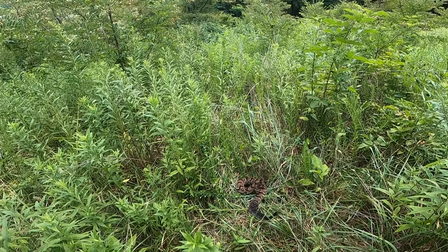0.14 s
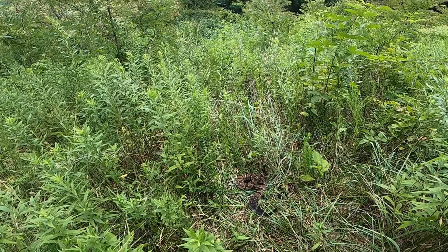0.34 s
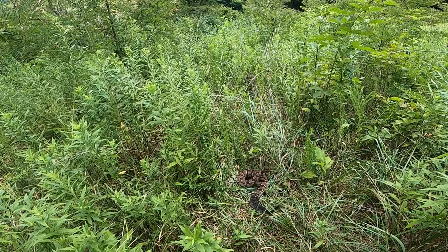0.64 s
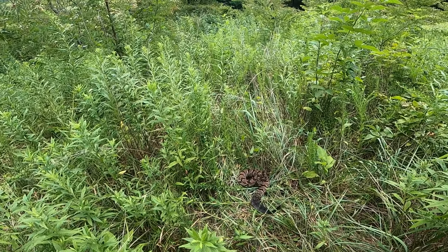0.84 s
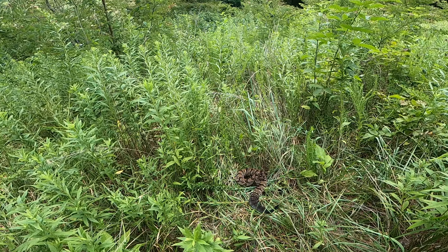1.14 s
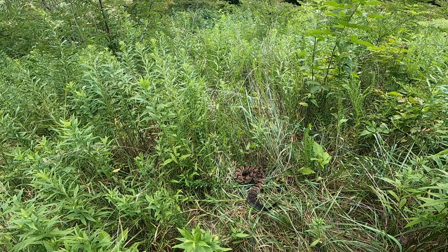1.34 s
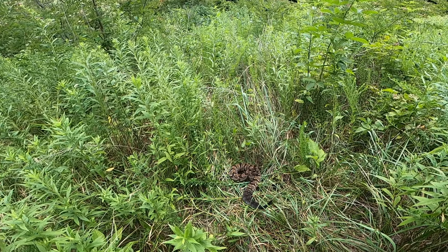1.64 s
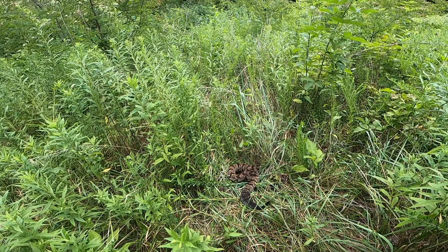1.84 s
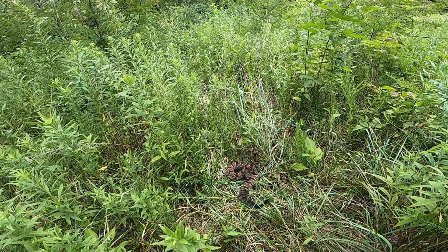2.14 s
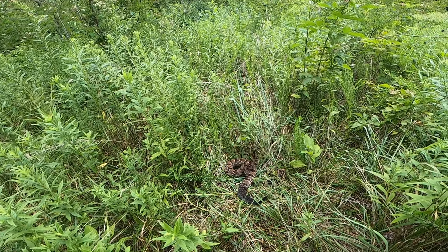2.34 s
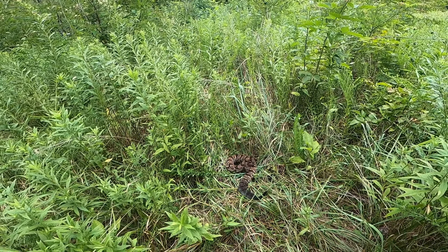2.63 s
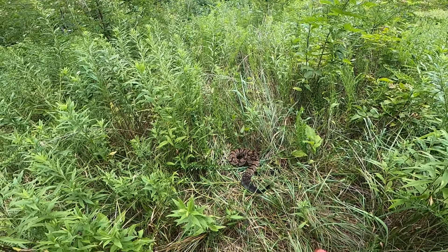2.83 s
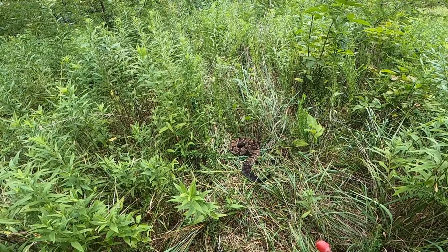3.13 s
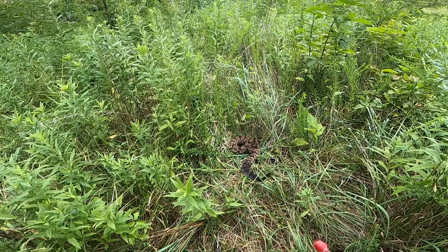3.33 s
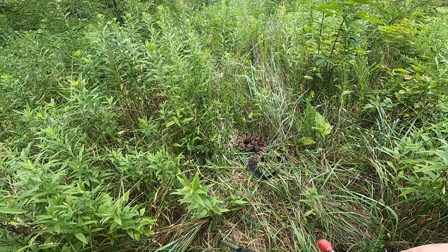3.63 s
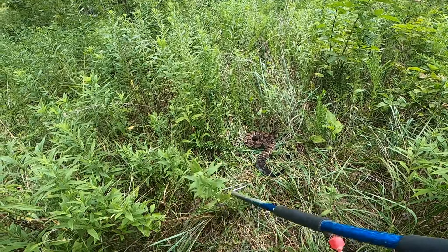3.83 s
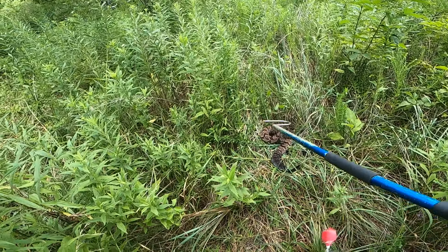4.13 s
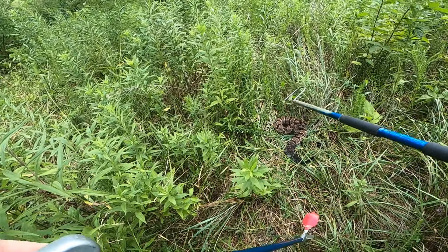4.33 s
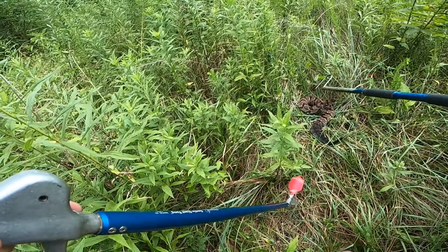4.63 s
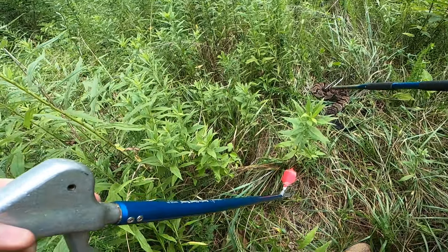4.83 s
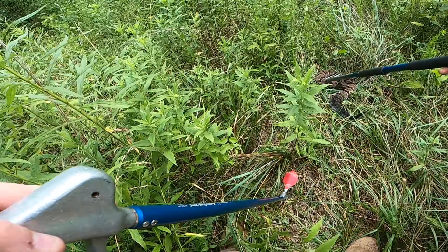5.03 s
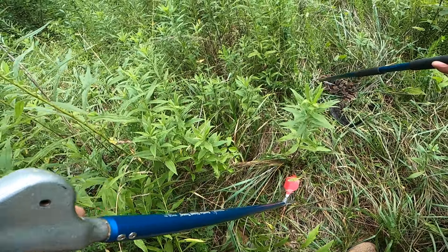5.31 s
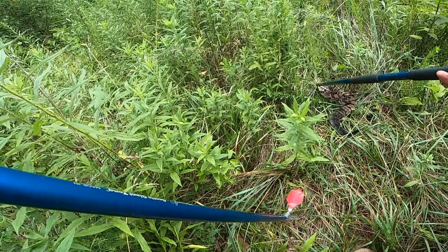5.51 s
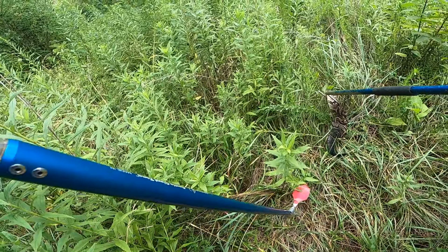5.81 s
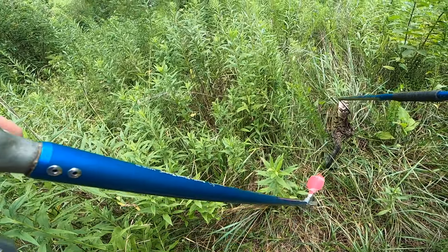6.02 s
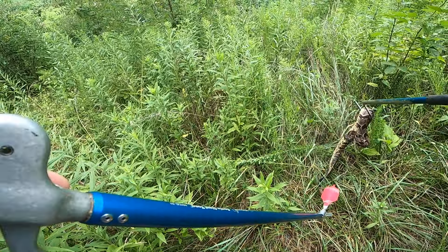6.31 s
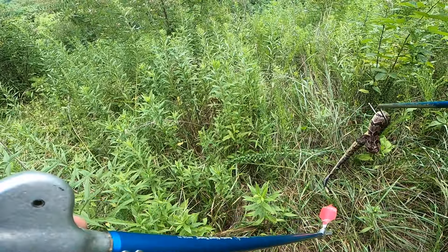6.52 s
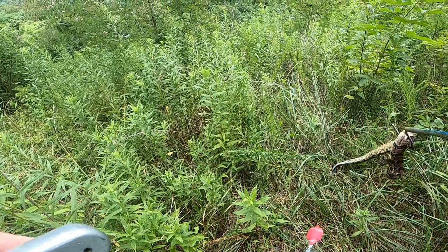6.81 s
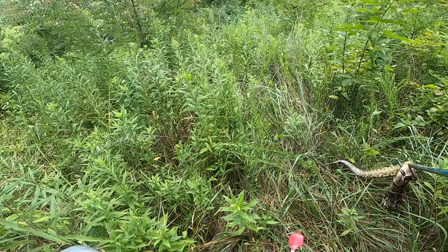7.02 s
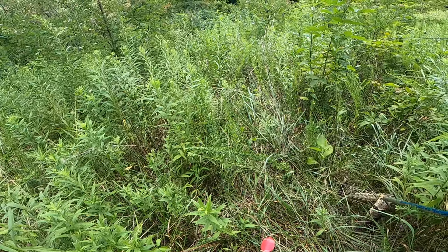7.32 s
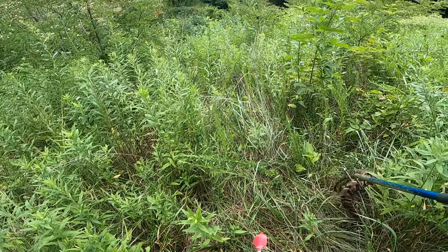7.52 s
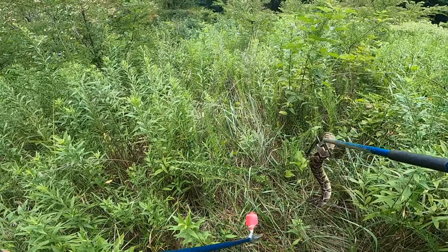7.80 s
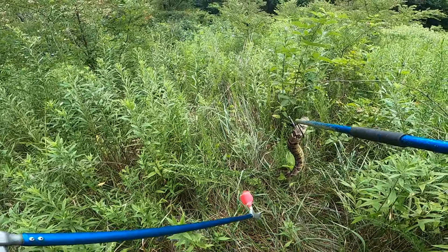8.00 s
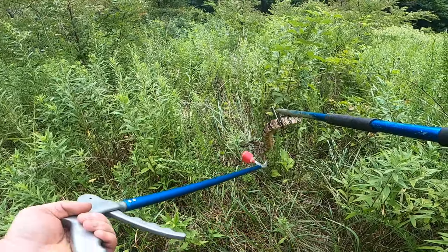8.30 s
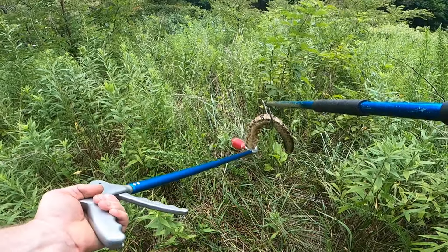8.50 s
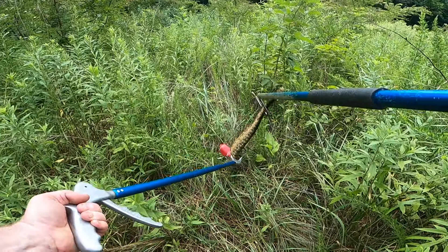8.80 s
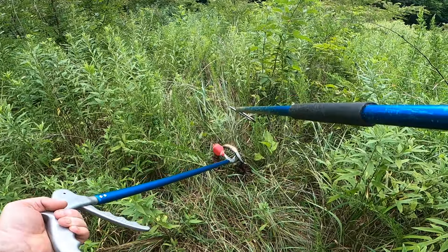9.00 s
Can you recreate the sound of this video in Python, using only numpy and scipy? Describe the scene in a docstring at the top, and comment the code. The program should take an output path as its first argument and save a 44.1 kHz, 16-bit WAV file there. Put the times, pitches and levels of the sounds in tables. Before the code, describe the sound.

A rattlesnake buzzes loud, dry and steady in tall grass, faltering as it is lifted, with small tool knocks and soft low bumps.

```python
"""Tall grass outdoors, a distant hush behind: a rattlesnake buzzes to the right of a hand-held microphone.
It is lifted on a hook, swings free and is lowered toward tongs; the buzz falters or surges at its lurches.
The tail shakes some 75 times a second, four clacks a shake, each a volley of clicks ringing hollow segments.
Tools knock as noise bursts with a damped ring, clothes and grass rustle as swelling filtered noise,
and puffs of low noise and short low tones that swell and fade reach the microphone as soft bumps."""
import sys
import numpy as np
from scipy import signal
from scipy.fft import rfft, irfft, next_fast_len
from scipy.io import wavfile
from scipy.ndimage import uniform_filter1d, map_coordinates

SR = 44100
rng = np.random.default_rng(int(sys.argv[2]) if len(sys.argv) > 2 else 0)


def materialize(psi):
    """Save the field psi as 16-bit PCM at rate SR to the path in sys.argv[1].

    A 1-D psi becomes a single channel; in a 2-D psi each row is a channel.
    """
    bounded = np.clip(np.atleast_2d(psi).T, -1, 1)
    quanta = np.round(bounded * 32767).astype(np.int16)
    wavfile.write(sys.argv[1], SR, quanta)


N = 403515  # length in samples

# Levels are relative: brushes, sweeps, puffs, knocks and the rattling effort add a gain set in scene(),
# thumps and flicks do not.
# Spectrum of the distant outdoor hush: pitch_hz, density_db (per Hz, relative)
FIELD_COLOUR = [(30, -19), (95, -29), (150, 5.5), (250, -0.5), (420, -19), (750, -16), (1500, -36),
                (5000, -29)]
# Spectrum of brushing cloth: pitch_hz, density_db (per Hz, relative)
CLOTH_COLOUR = [(80, -32), (160, -4.5), (300, 3), (480, -1), (750, -6), (1200, -8.5), (3000, -22.5)]
# Sleeves brush as the handler moves: peak_s, level_db, length_s
BRUSHES = [(.48, -65, 0.45), (.9, -58, 0.97), (1.35, -67.5, .5), (2.75, -71, .8), (3.27, -68.5, 0.76),
           (4.04, -57.5, 0.61), (4.29, -61.5, 0.4), (5.1, -63, 0.97), (5.73, -60.5, 0.73),
           (7.13, -56.5, 0.53), (7.5, -65, 1), (8.3, -63.5, 1), (8.6, -61.5, 0.52), (9.05, -55, 0.48)]
# Spectrum of dry grass: pitch_hz, density_db (per Hz, relative)
GRASS_COLOUR = [(300, -22.5), (800, -18.5), (1100, -3.5), (1500, 0), (2100, -1), (3500, 7.5), (8000, -3.5),
                (15000, -19)]
# The tools sweep through the grass: peak_s, level_db, length_s
SWEEPS = [(.82, -56, 0.86), (4.03, -52, 1), (4.28, -52.5, 0.79), (5.1, -52.5, 0.62), (5.6, -55.5, 1),
          (6.6, -55.5, 1), (7.45, -53, 1), (8.15, -60, 0.97), (8.97, -53, .7)]
# Spectrum of air on the microphone: pitch_hz, density_db (per Hz, relative)
RUMBLE_COLOUR = [(10, 1), (25, 8), (48, 4), (70, -8.5), (100, -15.5), (150, -19), (300, -46), (1000, -88)]
# Puffs of air on the microphone: peak_s, level_db, length_s
PUFFS = [(.23, -64, .2), (1.21, -48, .2), (1.5, -39.5, 0.45), (2.16, -59, .12), (2.73, -50, 0.26),
         (3.22, -52.5, 0.34), (3.69, -57.5, 0.17), (5.17, -55, 0.18), (5.6, -42.5, 0.53),
         (5.88, -36.5, 0.39), (6.85, -64, .13), (7.99, -51.5, 0.18), (8.14, -52.5, .15), (8.36, -61, 0.11),
         (8.66, -65, .14), (9.07, -62, .14)]
# Soft bumps: centre_s, level_db, pitch_hz, half_length_s
THUMPS = [(1.281, -39.5, 70, 0.0062), (1.44, -24.5, 48.4, 0.013), (1.547, -36, 96, 0.011),
          (1.693, -38.5, 55, 0.0061), (2.157, -43, 250, 0.0029), (2.691, -49, 65, 0.0078),
          (2.735, -44, 135, 0.0052), (5.8, -29, 50, 0.014), (5.866, -28, 50.7, 0.041),
          (5.871, -31, 96, 0.013), (8.013, -52, 75, 0.017), (9.067, -37, 182, 0.0044)]
# Spectrum of a tool knock: pitch_hz, density_db (per Hz, relative)
KNOCK_COLOUR = [(60, -42), (180, 4.5), (450, -1), (800, -0.5), (1400, 4.5), (2600, 3.5), (4000, 6.5),
                (9000, -13), (15000, -25)]
# Knocks of the tools and of stems against them:
# start_s, level_db, ring_hz, left_over_right_db, ring_db, snap_db (treble tilt reached at 10 kHz)
KNOCKS = [(0.42,-40.5,1790,1,-3,-2), (0.465,-41.5,1950,3,-2,-2), (0.804,-35.5,1520,5,-10,2),
          (0.995,-30,1500,5,-15,-5), (1.09,-41,1940,2,3,0), (1.263,-23,1940,16,8,8),
          (1.5,-36.5,1900,2,-5,0), (1.83,-41,1290,3,3,4), (1.913,-40.5,1200,12,8,3),
          (2.126,-39.5,1220,2,4,0), (2.15,-33.5,1180,2,7,2), (2.394,-40.5,1200,.5,-11,2),
          (2.688,-33.5,2310,4,0,0), (2.726,-38,1320,1.5,-13,1), (3.955,-32.5,2580,1,4,-2),
          (4.135,-26.5,1530,-2,4.5,1), (4.14,-24.5,2840,3,12,1), (4.214,-27,2130,4,14,-3),
          (4.225,-29.5,2100,5,21,-3), (4.245,-34,1900,5,16,6), (4.259,-24.5,2080,-1,14.5,-3),
          (4.261,-23.5,2700,5,19,3), (4.379,-36,1690,4,7,4), (4.429,-38,1620,-1,7,2),
          (4.722,-36,2790,4,12,0), (5.041,-41.5,1460,3,11,6), (5.09,-36.5,1500,6,3,-2),
          (5.121,-36,1390,3,1,0), (5.726,-35,1660,9,18,0), (8.23,-41.5,1580,6,20,0),
          (8.731,-44,1530,1.5,25,0), (8.809,-43.5,1510,-1,11,0), (9.062,-20,2460,-2,-2,19.5)]
# Tail speed: time_s, shake_rate_hz
SHAKE_RATE = [(0, 72.5), (1.2, 75), (1.7, 73.7), (2.7, 72.7), (3.1, 77.5), (3.7, 75.5), (4.0, 77.5),
              (4.4, 75.5), (4.9, 79), (5.7, 75.5), (6.3, 68), (6.55, 73), (6.9, 72), (7.25, 80), (9.15, 81)]
# A dangling tail stresses one clack per shake: time_s, depth_db
FREE_TAIL = [(5.5, .8), (6.3, 6), (6.55, 1.5), (6.9, 5), (7.25, 5), (7.8, 1.5)]
# Effort of the rattling: time_s, level_db
EFFORT = [(0, -32), (.65, -34), (1.3, -33), (3.45, -31.5), (4.3, -31.5), (5.1, -32.5), (5.7, -33),
          (6.8, -32), (7.6, -34), (8.3, -32.5), (9.15, -32.5)]
# The buzz falters or surges as the body swings on the hook: centre_s, change_db, half_length_s
LURCHES = [(6.402, -4.5, 0.027), (6.61, -3, 0.044), (6.695, 0, .02), (6.759, -6, 0.026), (6.83, -0.5, .025),
           (6.957, -10, 0.012), (7.025, -5.5, 0.018), (7.09, -6, .014), (7.245, -12, 0.038),
           (7.315, 1.5, .02), (7.357, -8, 0.02), (7.454, -4, 0.027), (7.548, -5.5, .013), (7.59, 1, .018),
           (7.632, -5.5, 0.014), (7.695, 0.5, .022), (7.794, -11, 0.044), (7.865, 4, .035),
           (7.973, -9, 0.0063), (9.008, 0.5, 0.016), (9.099, -23, 0.018)]
# Single hard clacks as the tail whips about: start_s, level_db
FLICKS = [(8.9295, -23), (8.998, -21), (9.0105, -22), (9.0547, -16), (9.0587, -14), (9.0635, -13),
          (9.0885, -28)]
# The hollow rattle's colour in seven postures, each: pitch_hz, density_db (per Hz, relative)
ALERT = [(1000,-44), (2350,-42), (3150,-6), (3850,-4), (4550,5), (4950,-5), (5300,2.5), (5700,-9.5),
         (6500,-11), (7400,-1.5), (8200,-19), (9000,-25), (11200,-23), (15000,-32)]
COILED = [(1000,-40), (2350,-28.5), (3150,-5), (3850,-1.5), (4600,2), (4950,-3.5), (5300,-3), (5600,-7.5),
          (6500,0.5), (7400,-3), (8200,-23), (9000,-17.5), (11200,-21.5), (15000,-29)]
RAISED = [(1000,-50), (2350,-27.5), (3150,-5), (3850,-3.5), (4550,-2.5), (4950,-2), (5300,3), (5700,-1.5),
          (6500,0), (7400,-4.5), (8200,-16.5), (9000,-19.5), (11200,-23), (15000,-27.5)]
HOOKED = [(1000,-36), (2350,-33.5), (3150,-7.5), (3850,-8), (4550,0.5), (4950,-7), (5300,-4.5), (5700,-5.5),
          (6500,-4.5), (7400,-4.5), (8200,-24), (9000,-22), (11200,-26), (15000,-34)]
GRIPPED = [(1000,-39), (2350,-35), (3150,-3.5), (3850,-4), (4350,2.5), (4950,0.5), (5300,1.5), (5700,-2),
           (6500,-3.5), (7400,-0.5), (8200,-18), (9000,-20), (11200,-22.5), (15000,-29)]
HANGING = [(1000,-35.5), (2350,-41), (3150,-8), (3850,0.5), (4550,2), (4950,1), (5300,-1), (5700,-9),
           (6500,-3.5), (7400,-4.5), (8200,-25), (9000,-23), (11200,-25), (15000,-32.5)]
LOWERED = [(1000,-36.5), (2350,-22), (3150,-2.5), (3850,1), (4550,-2.5), (4950,-1), (5300,0.5), (5700,-2),
           (6500,-3.5), (7400,-3), (8200,-13), (9000,-19.5), (11200,-20), (15000,-28.5)]
# Order of the postures: start_s, colour (one of the tables above)
POSTURES = [(0, ALERT), (.4, COILED), (3.25, RAISED), (4.25, HOOKED), (4.9, GRIPPED), (6.3, HANGING),
            (8.1, LOWERED)]
# Stems scatter the treble more widely: pitch_hz, side_over_mid_db
SCATTER_WIDTH = [(3000, -7), (6500, -2), (8500, 0.5), (14000, 1)]
# Depth of the drifting colour: time_s, depth_db
SWAY = [(0, 1.3), (4.2, 1.3), (5, 2), (6.4, 2.8), (7.9, 2.8), (8.3, 2.3), (9.15, 2.3)]
# Centre of the strongest band: time_s, pitch_hz
BRIGHT_BAND = [(0, 4500), (2.9, 4630), (4.5, 4500), (5.4, 4400), (6.25, 4170), (6.6, 4670), (7.7, 4740),
               (7.97, 4370), (8.25, 5120), (8.5, 5170), (8.76, 5800), (8.92, 5500), (9.04, 4450),
               (9.14, 5230)]
# The two microphone ports, toward the snake: pitch_hz, left_over_right_db, left_lag_rad (before BEARING)
PORTS = [(1500, -1, 1.4), (3700, 3, 0.38), (3600, 3, 1.26), (4780, 4.5, 1.13), (5200, -3, 2.04),
         (5770, 1, 1.54), (6440, -4, 1.4), (6930, 9, 1.71), (8580, -8, 3.5), (8800, -4.5, 0.79),
         (11400, 2, 3.32), (12500, -6, 3.1)]
# How far to the right the snake lies: time_s, lag_multiple (of the port lag)
BEARING = [(3.2, .85), (4.1, .95), (4.6, 1.3), (5.3, 1.5), (6.0, 1.35), (7.5, 1.2), (8.5, 1.0)]
# Overall balance of the snake between the ports: time_s, left_over_right_db
BALANCE = [(0.0, -3), (0.99, -2), (3.16, -2.5), (3.47, -2.5), (4.33, -2), (4.87, -3.5), (7.9, -3.5),
           (8.36, -3), (9.15, -2)]

FLICK_T60_S = .009  # 60 dB decay of a hard clack
TURN_S = .25  # time to change posture
TOP_HZ = 15750  # band limit of the microphone chain


def amp(db):
    """Decibels to gain."""
    return 10 ** (np.asarray(db) / 20)


def unit(x):
    """Scale to rms 1."""
    return x / np.sqrt(np.mean(x ** 2) + 1e-20)


def along(points, hz):
    """Read (pitch_hz, value) points on a log frequency axis."""
    f, v = np.transpose(points)
    return np.interp(np.log(hz + 1), np.log(f + 1), v)


def curves(rows):
    """One value per sample for each column after the time."""
    s, *cols = np.transpose(rows)
    return [np.interp(np.arange(N) / SR, s, c) for c in cols]


def wobble(rate):
    """A smooth random curve, rate knots a second."""
    knots = rng.standard_normal(int(N * rate / SR) + 4)
    return map_coordinates(knots, [np.arange(N) * rate / SR])


def filtered(x, response):
    """Multiply the spectrum of x by a response of frequency."""
    n = x.shape[-1]
    m = next_fast_len(n + 8192)
    return irfft(rfft(x, m) * response(np.fft.rfftfreq(m, 1 / SR)), m)[..., :n]


def coloured(x, colour):
    """Filter x to a spectrum table, at rms 1."""
    return unit(filtered(x, lambda hz: amp(along(colour, hz))))


def resonate(x, colour, size=512):
    """Ring x through a causal, minimum-phase body of the given colour."""
    cepstrum = irfft(np.log(amp(along(colour, np.fft.rfftfreq(size, 1 / SR)))))
    # folding the cepstrum puts the energy as early as possible
    cepstrum[1:size // 2] *= 2
    cepstrum[size // 2 + 1:] = 0
    impulse = irfft(np.exp(rfft(cepstrum)))
    return signal.oaconvolve(x, impulse[None], axes=1)[:, :N]


def panned(left_db):
    """Left and right gains of constant power."""
    left_db = np.atleast_1d(left_db)
    gains = amp(np.array([left_db, -left_db]) / 2)
    return gains / np.sqrt(np.mean(gains ** 2, axis=0))


def noise_pair(n, side_db):
    """White stereo noise, its likeness in both ears set by the side level."""
    mid, side = rng.standard_normal((2, n))
    side = amp(side_db) * side
    return np.array([mid + side, mid - side])


def add(track, s, sound):
    """Mix a short sound in at time s."""
    room = track[:, max(round(s * SR), 0):][:, :sound.shape[1]]
    room += sound[:, :room.shape[1]]


def bell(t, centre, half):
    """Gaussian bump of height 1, down to 1/e at half either side."""
    return np.exp(-((t - centre) / half) ** 2)


def swells(rows, floor_db, rise_share, roundness):
    """Gain of swells over a floor; each is 20 dB down at both ends of its length."""
    t, rise = np.arange(N) / SR, np.clip(rise_share, .1, .9)
    power = np.full(N, amp(floor_db) ** 2)
    for s, db, length in rows:
        near = slice(max(int((s - 2 * length) * SR), 0), int((s + 2 * length) * SR))
        away = np.maximum((s - t[near]) / rise, (t[near] - s) / (1 - rise)) / length
        power[near] += amp(db - 20 * away ** roundness) ** 2
    return np.sqrt(power)


def field_hush(gain_db):
    """The distant outdoors: steady, wide filtered noise."""
    return coloured(noise_pair(N, side_db=-2.5), FIELD_COLOUR) * amp(gain_db)


def clothes(gain_db):
    """Fabric friction: soft noise that swells with each brush of a sleeve."""
    brushing = swells(BRUSHES, floor_db=-74, rise_share=0.53, roundness=1.55)
    return coloured(noise_pair(N, side_db=-7.5), CLOTH_COLOUR) * brushing * amp(gain_db)


def grass(gain_db, crackle_db):
    """Dry blades: noise with a fast random level crackles finely and swells as the tools sweep through."""
    sweeping = swells(SWEEPS, floor_db=-59.5, rise_share=0.51, roundness=1.24)
    crackle = amp(crackle_db * wobble(400) + 1.46 * wobble(25))
    blades = coloured(noise_pair(N, side_db=-6) * crackle, GRASS_COLOUR)
    return blades * sweeping * amp(gain_db) * panned(0.45)


def air_puffs(gain_db, left_db):
    """Moving air buffets the microphone: swelling low noise, stronger on the right port."""
    puffing = swells(PUFFS, floor_db=-84.5, rise_share=.42, roundness=1.3)
    air = coloured(noise_pair(N, side_db=0), RUMBLE_COLOUR)
    return air * puffing * amp(gain_db) * panned(left_db)


def soft_thumps(left_db):
    """Soft bumps: low sines under short bell envelopes, almost all on the right port."""
    t, low = np.arange(N) / SR, np.zeros(N)
    for s, db, hz, half in THUMPS:
        low += amp(db) * bell(t, s, half) * np.sin(2 * np.pi * hz * (t - s))
    return low * panned(left_db)


def knocks(gain_db, attack_s, t60, ring_gain_db, ring_width_hz, ring_t60, tail_db, tail_t60):
    """Each knock is a short dry scuff, one broad damped resonance and a faint after-rustle."""
    track, t = np.zeros((2, N)), np.arange(SR // 5) / SR
    rise = 1 - np.exp(-(t / attack_s) ** 2)
    scuff_shape = rise * (amp(-60 * t / t60) + amp(tail_db - 60 * t / tail_t60))
    ring_shape = rise * amp(-60 * t / ring_t60)
    for s, db, ring_hz, left_db, ring_db, snap_db in KNOCKS:
        def body(hz):
            return amp(along(KNOCK_COLOUR, hz) + along([(2500, 0), (10000, snap_db)], hz))

        def resonance(hz):
            return 1 / (1 + ((hz - ring_hz) / ring_width_hz) ** 2)

        scuff = scuff_shape * unit(filtered(noise_pair(len(t), side_db=-13.5), body))
        ring = ring_shape * unit(filtered(noise_pair(len(t), side_db=-13.5), resonance))
        share = amp(ring_db + ring_gain_db)
        knock = (scuff + share * ring) / np.hypot(1, share)
        add(track, s, amp(db + gain_db) * knock * panned(left_db))
    return track


def effort_db():
    """Level of the rattling, with a brief dip or surge at each lurch."""
    t = np.arange(N) / SR
    return curves(EFFORT)[0] + sum(db * bell(t, s, half) for s, db, half in LURCHES)


def segment_clicks(spread_s, size_db, jitter_s, uneven_db, count=30):
    """Four clacks per shake; each sets the chain of loose segments off as a volley of tiny clicks."""
    rate, swing_db = curves(SHAKE_RATE)[0], curves(FREE_TAIL)[0]
    clack_number = np.floor(np.cumsum(rate) * 4 / SR)
    at = np.flatnonzero(np.diff(clack_number))
    beat = np.cos(np.pi / 2 * np.arange(len(at)) + np.pi / 8)  # repeats every four clacks
    size = amp(swing_db[at] * beat)  # a free tail hits hardest once per shake
    size /= np.sqrt(uniform_filter1d(size ** 2, size=4))
    size *= amp(uneven_db * rng.standard_normal(len(at)))  # clacks vary in hardness
    delay = spread_s * rng.random((len(at), count))
    jitter = jitter_s * rng.standard_normal((len(at), 1))  # shared by a whole volley
    when = at[:, None] + SR * (delay + jitter)
    hardness = amp(size_db * rng.standard_normal((len(at), count)))
    sign = np.sign(rng.standard_normal((len(at), count)))
    blows = size[:, None] * hardness * sign
    sample = np.clip(when, 0, N).astype(int)
    return unit(np.bincount(sample.ravel(), blows.ravel(), N + 1)[:N])


def through_grass(x, scatter_db, t60):
    """The direct sound plus a brief diffuse scatter off stems and ground."""
    decay = amp(-60 * np.arange(SR // 10) / SR / t60) ** 2
    energy = signal.oaconvolve(x ** 2, decay / decay.sum())[:N]
    mid, side = rng.standard_normal((2, N))
    side = filtered(side, lambda hz: amp(along(SCATTER_WIDTH, hz)))
    scatter = np.sqrt(np.abs(energy)) * np.array([mid + side, mid - side])
    return (x + amp(scatter_db) * scatter) / np.hypot(1, amp(scatter_db))


def posture_entered(start_s):
    """Ramp from 0 to 1 centred on the start of a posture."""
    return np.clip((np.arange(N) / SR - start_s) / TURN_S + .5, 0, 1)


def hollow_shells(clicks):
    """The shells ring the clicks, crossfading between the colours of the postures."""
    entered = [np.ones(N)] + [posture_entered(s) for s, _ in POSTURES[1:]] + [np.zeros(N)]
    buzz = np.zeros((2, N))
    for k, (_, colour) in enumerate(POSTURES):
        power = np.mean(amp(along(colour, np.linspace(0, SR / 2, SR // 100))) ** 2)
        buzz += (entered[k] - entered[k + 1]) * resonate(clicks, colour) / np.sqrt(power)
    return buzz


def bright_band(t, hz, earlier_db, lowered_db, earlier_width_hz, lowered_width_hz):
    """Gain in dB of the strongest band, which glides, widens and stands out once the snake is lowered."""
    centre = np.interp(t, *np.transpose(BRIGHT_BAND))
    lowered = np.clip((t - POSTURES[-1][0]) / TURN_S + .5, 0, 1)
    height = earlier_db + (lowered_db - earlier_db) * lowered
    width = earlier_width_hz + (lowered_width_hz - earlier_width_hz) * lowered
    return height * bell(hz[:, None], centre, width)


def smooth_power(z):
    """Power of both channels in each frame, averaged over nine frames."""
    return uniform_filter1d(np.sum(np.abs(z) ** 2, axis=(0, 1)), size=9)


def drifting_colour(x):
    """Paths through the grass interfere: random peaks and notches come and go, mostly alike at both ears."""
    hz, t, z = signal.stft(x, SR, nperseg=512)
    drift = rng.standard_normal((3, *z.shape[1:]))
    drift = uniform_filter1d(drift, size=4, axis=1)  # across frequency
    shared, left, right = uniform_filter1d(drift, size=45, axis=2)  # across time
    drift = unit(shared + 0.28 * np.array([left, right]))
    depth_db = np.interp(t, *np.transpose(SWAY))
    band_db = bright_band(t, hz, earlier_db=2.5, lowered_db=6.2, earlier_width_hz=190, lowered_width_hz=720)
    moved = z * amp(depth_db * drift + band_db)
    # only the colour drifts: the smoothed level is put back
    level = np.sqrt(np.abs(smooth_power(z) / smooth_power(moved)))
    return signal.istft(moved * level, SR, nperseg=512)[1][:, :N]


def rattle(gain_db, flutter_db):
    """Segment clicks scatter in the grass and ring hollow shells, coloured by the snake's posture."""
    clicks = segment_clicks(spread_s=.0028, size_db=1.0, jitter_s=.00012, uneven_db=.7)
    clicks = (clicks * amp(effort_db() + gain_db + flutter_db * wobble(35)))[None]
    short = np.arange(SR // 100) / SR
    for s, db in FLICKS:
        add(clicks, s, amp(db - 60 * short / FLICK_T60_S) * rng.standard_normal((1, len(short))))
    clicks = through_grass(clicks[0], scatter_db=-4.8, t60=.04)
    return drifting_colour(hollow_shells(clicks))


def at_ports(x):
    """The snake lies to the right: its sound lags at the left port, and the microphone body shades each."""
    ports = np.array(PORTS)
    hz, t, z = signal.stft(x, SR, nperseg=512)
    lag = np.outer(along(ports[:, ::2], hz), np.interp(t, *np.transpose(BEARING)))
    shading = panned(along(ports[:, :2], hz))[..., None]
    heard = z * shading * np.exp(.5j * np.array([-lag, lag]))
    return signal.istft(heard, SR, nperseg=512)[1][:, :N] * panned(curves(BALANCE)[0])


def scene():
    """The field, the handler, the bumped microphone and the snake."""
    ambience = field_hush(gain_db=-68.5) + clothes(gain_db=2.0) + grass(gain_db=9.0, crackle_db=2.0)
    bumps = air_puffs(gain_db=3.5, left_db=-4.5) + soft_thumps(left_db=-19)
    tools = knocks(gain_db=3.5, attack_s=0.0015, t60=0.015, ring_gain_db=-10.5, ring_width_hz=174,
                   ring_t60=0.03, tail_db=-15, tail_t60=0.16)
    snake = at_ports(rattle(gain_db=2.5, flutter_db=.5))
    return ambience + bumps + tools + snake


def record(dry):
    """The microphone chain passes nothing above its band limit."""
    return filtered(dry, lambda hz: hz < TOP_HZ)


dry = scene()
out = record(dry)
materialize(out)
```